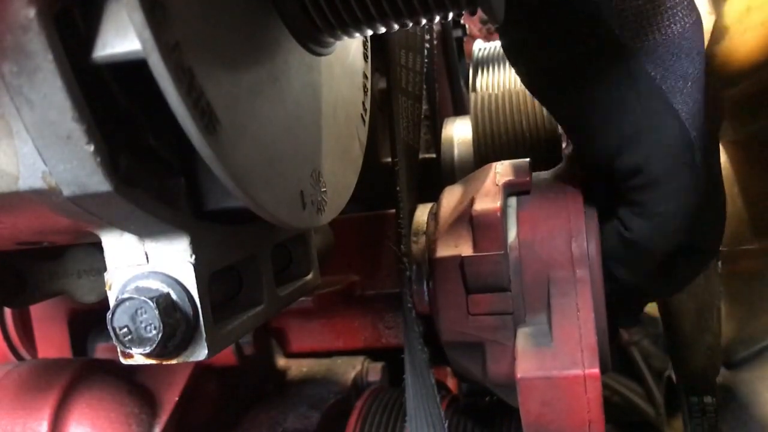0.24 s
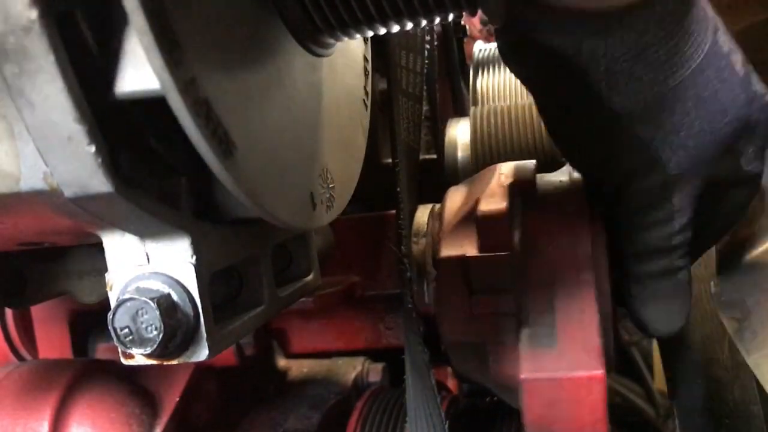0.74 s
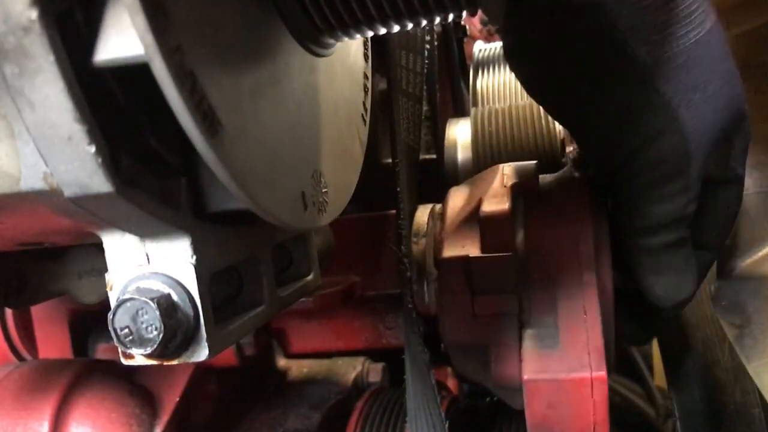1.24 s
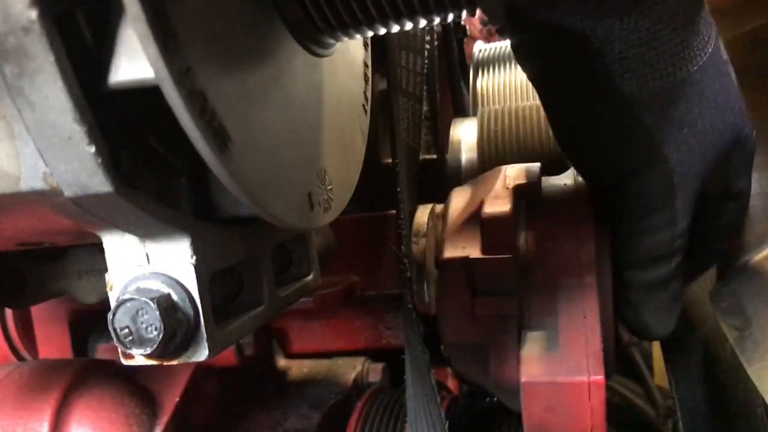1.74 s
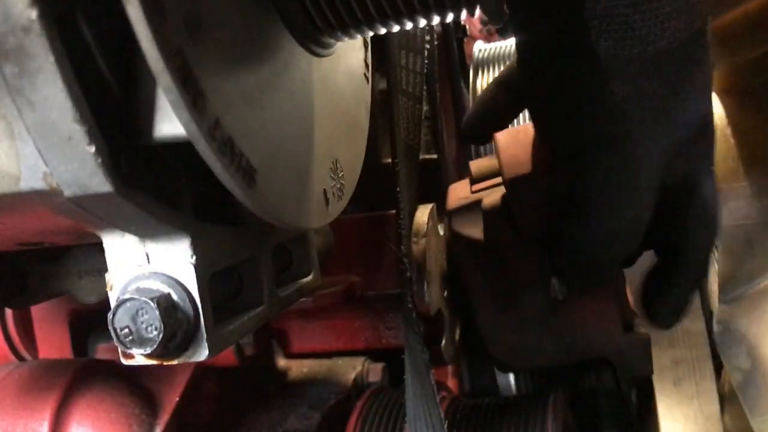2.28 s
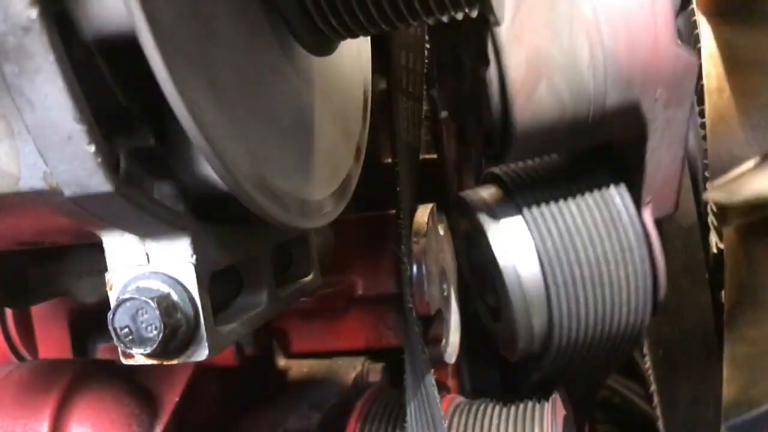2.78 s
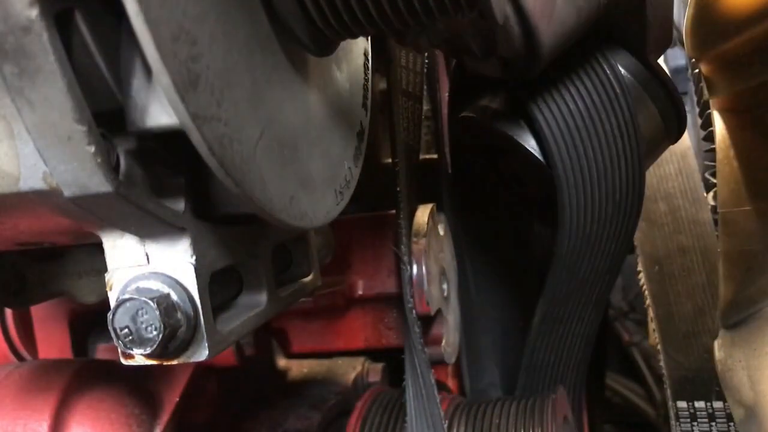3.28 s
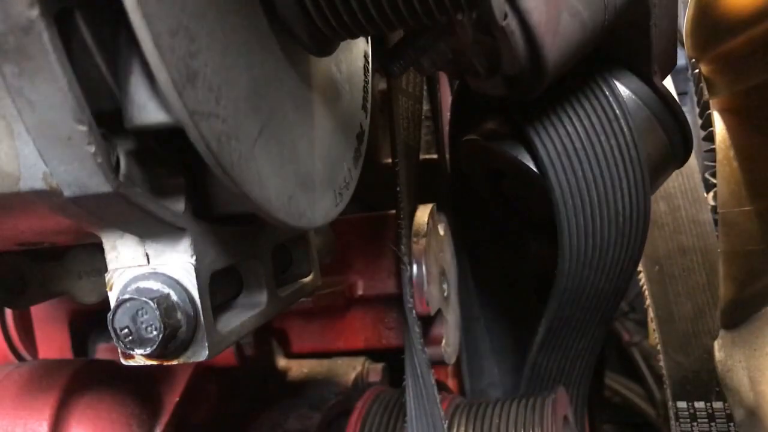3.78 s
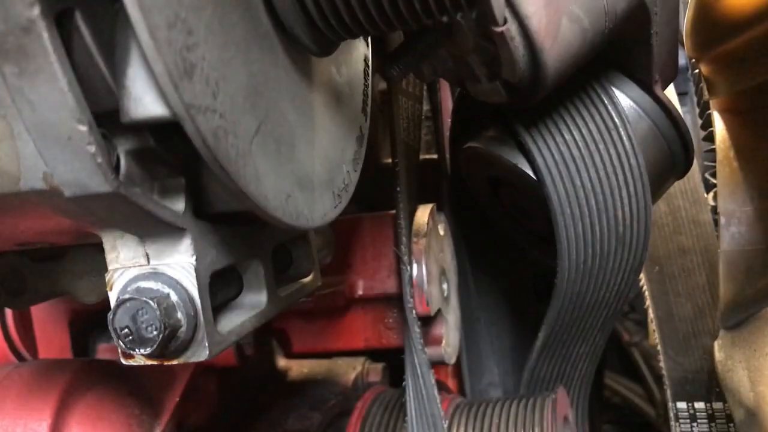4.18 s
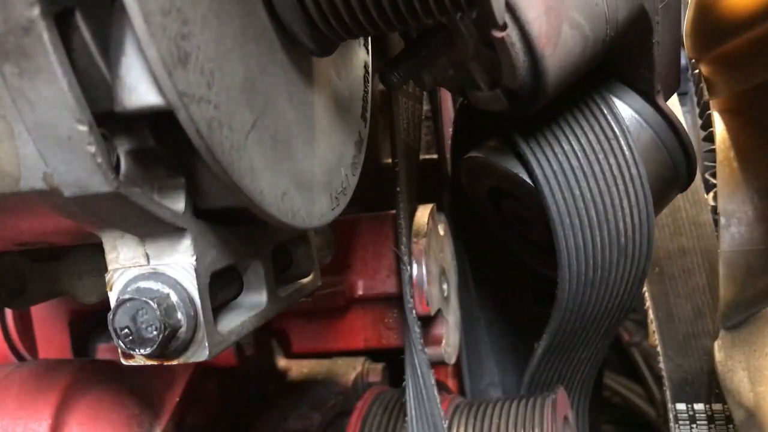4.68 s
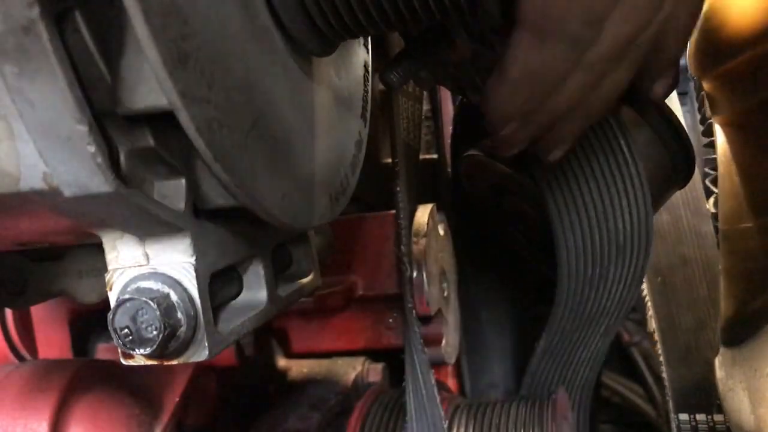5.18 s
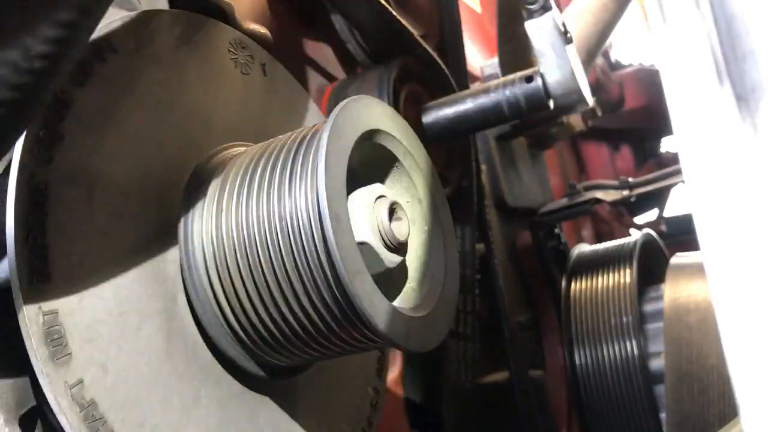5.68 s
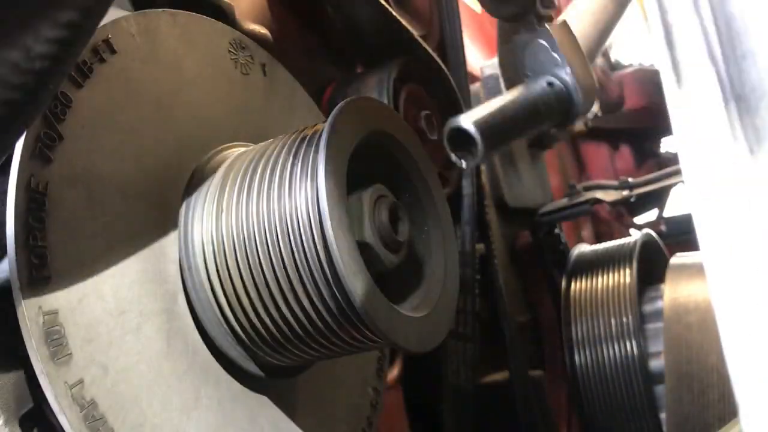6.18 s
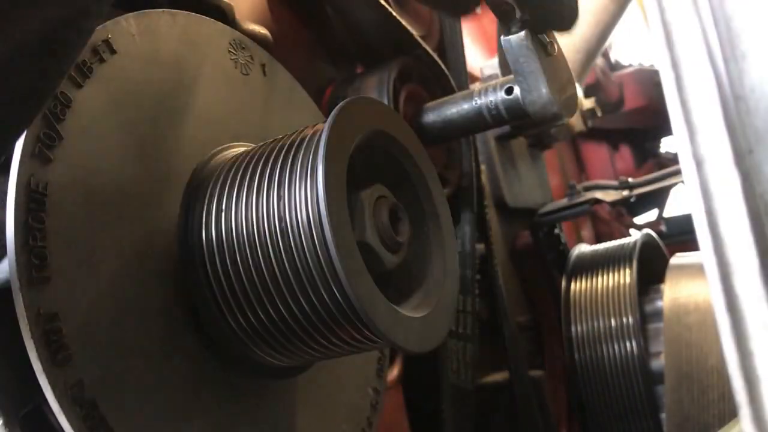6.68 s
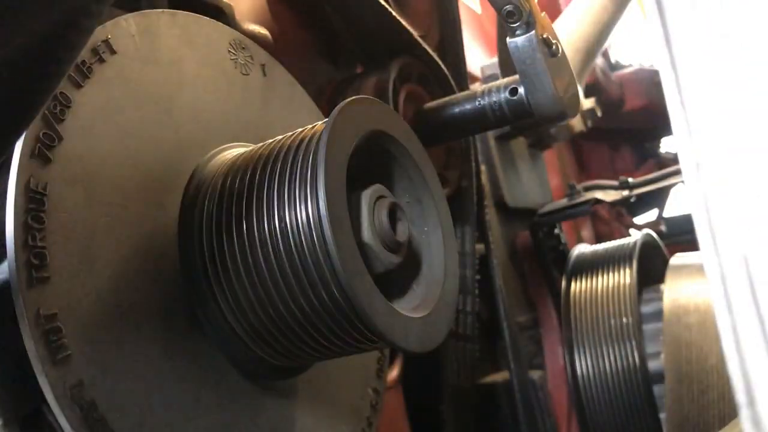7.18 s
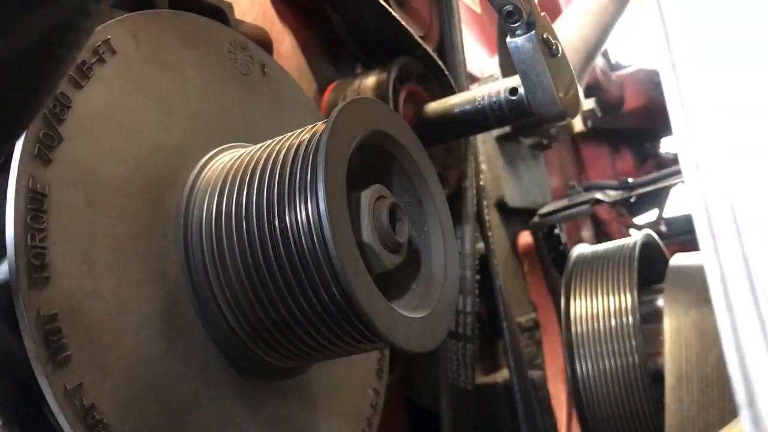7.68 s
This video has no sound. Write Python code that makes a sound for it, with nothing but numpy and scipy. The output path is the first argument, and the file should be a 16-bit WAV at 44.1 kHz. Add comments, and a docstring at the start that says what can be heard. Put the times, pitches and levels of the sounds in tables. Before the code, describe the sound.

In an engine bay, a heavy tensioner knocks and grinds, clacks hard, the slack belt flops, steel scrapes and chimes, then quieter ratchet clicks follow.

```python
"""Truck engine bay, close work: a tensioner knocks, clacks and grinds on its bracket; the slack belt flops.
Before an abrupt switch at 5.516 s a steel bolt scrapes and chimes; after it the shop is quieter.
Ratchet and socket click and a glove brushes throughout, over shop rumble, rustle, hiss and stray ticks.
Contacts are clumpy noise forces driving banks of resonances; bolt, pings and squeaks add wavering sines,
rasps and grinding a gliding rough band, rumble and rustle coloured noise."""
import sys
import numpy as np
from scipy import signal
from scipy.fft import rfft, irfft, next_fast_len
from scipy.io import wavfile
from scipy.ndimage import uniform_filter1d, map_coordinates

SR = 44100
rng = np.random.default_rng(int(sys.argv[2]) if len(sys.argv) > 2 else 0)


def master_out(mix):
    """Clip the mix to full scale and print it as 16-bit PCM to the path in sys.argv[1]."""
    frames = np.transpose(np.atleast_2d(mix))
    ceiling = np.clip(frames, -1, 1)
    pcm = np.round(ceiling * 32767).astype(np.int16)
    wavfile.write(sys.argv[1], SR, pcm)


N = 350165

# Resonances of the cast bracket. Each row: centre in Hz, width in Hz, relative level in dB.
CASTING_MODES = [(289, 50, 3.5), (462, 21.5, 2), (693, 102, 1.5), (888, 26, 6.5), (1000, 42, -7),
                 (1070, 140, -5.5), (1145, 50, -1), (1335, 30, -0.5), (1430, 240, -12.5), (1800, 77, -22),
                 (2220, 20.3, -12.5), (2415, 38.3, -15), (2760, 72, -23.5), (3180, 56, -13.5),
                 (3970, 20, -15), (4150, 96, -15), (4750, 60, -37.5)]
# Unresolved ringing between the casting's resonances. Each row: frequency in Hz, relative level in dB.
CASTING_WASH = [(60, -24), (250, -7.5), (900, -14.5), (2500, -11.5), (4500, -32.5), (6500, -41),
                (10000, -49.5), (15000, -62.5)]
# Unresolved ringing of the bolt. Each row: frequency in Hz, relative level in dB.
STEEL_WASH = [(300, -39.5), (1500, -14), (4000, -12), (7500, -23), (11000, -40), (15000, -56)]
# Resonances of ratchet and socket. Each row: centre in Hz, width in Hz, relative level in dB.
RATCHET_MODES = [(1360, 57, -9), (2580, 300, 7), (2930, 180, -4), (3750, 200, -5), (4200, 300, -7),
                 (5150, 230, -9), (6860, 400, -13), (8400, 300, -23), (11900, 250, -40)]
# Body of rustle and belt rub. Each row: frequency in Hz, relative density in dB per Hz.
RUSTLE_LOW = [(300, -1), (600, 8.5), (1000, 1.5), (1500, 1.5), (2200, -8), (3200, -27.5), (5000, -60.5)]


def amp(db):
    """Decibels to gain."""
    return 10 ** (np.asarray(db) / 20)


def unit(x):
    """x scaled to rms 1."""
    return x / np.sqrt(np.mean(x ** 2) + 1e-20)


def along(points, hz):
    """(Hz, value) points interpolated on a log frequency axis."""
    f, v = np.transpose(points)
    return np.interp(np.log(hz + 1), np.log(f + 1), v)


def clock(count=N):
    """Seconds at each sample."""
    return np.arange(count) / SR


def curves(rows):
    """One value per sample for each column after the time."""
    s, *cols = np.transpose(rows)
    return [np.interp(clock(), s, c) for c in cols]


def wobble(rate, count=N):
    """A smooth random curve, rate knots a second."""
    knots = rng.standard_normal(int(count * rate / SR) + 4)
    return map_coordinates(knots, [clock(count) * rate])


def filtered(x, response):
    """x times a complex response of frequency, zero-padded."""
    m = next_fast_len(len(x) + SR // 10)
    return irfft(rfft(x, m) * response(np.fft.rfftfreq(m, 1 / SR)), m)[:len(x)]


def noise(spectrum):
    """Coloured noise of rms 1."""
    return unit(filtered(rng.standard_normal(N), lambda hz: amp(along(spectrum, hz))))


def held(length, t60, rise):
    """An envelope that rises, holds for length and dies away; all in seconds."""
    t = clock(SR // 6)
    return (1 - np.exp(-t / rise)) * amp(-60 * np.maximum(t - length, 0) / t60)


def friction(envelope, grain_db, rate):
    """A force of tiny slips: noise in uneven clumps, its spectrum flattened to push at all frequencies."""
    shape = np.sqrt(envelope)
    clumps = amp(grain_db * wobble(rate, count=len(shape)))
    slips = rfft(rng.standard_normal(len(shape)) * clumps * shape)
    flat = irfft(np.exp(1j * np.angle(slips)), len(shape))
    return flat * shape


def ring(force, modes, wash, bright_db, vary_db):
    """A body driven by a force; each contact shares the energy differently among the modes."""
    count = len(force)
    hz = np.fft.rfftfreq(2 * count, 1 / SR)
    # countless minor modes leave the wash uneven
    ripple_db = 4.5 * map_coordinates(rng.standard_normal(size=300), [hz / 80])
    power = amp(along(wash, hz) + ripple_db) ** 2
    for c, width, db in modes:
        gain = amp(db + vary_db * rng.standard_normal())
        resonance = np.abs(hz * width / (c * c - hz * hz + 1j * hz * width))
        power = power + (gain * resonance) ** 2 / (1 + (hz / (2 * c)) ** 4)
    tilt = amp(bright_db * np.log2(np.clip(hz, 200, None) / 1000))  # bright_db per octave
    # minimum phase keeps it causal: nothing rings before the touch
    cepstrum = irfft(np.log(np.sqrt(power) * tilt + 1e-7))[:count]
    response = np.exp(rfft(2 * cepstrum, 2 * count) - cepstrum[0])
    return irfft(rfft(force, 2 * count) * response)[:count]


def favour(modes, mode_hz, boost_db):
    """The mode nearest mode_hz raised: the contact point decides which rings most."""
    nearest = np.argmin([abs(c - mode_hz) for c, width, db in modes])
    return [(c, width, db + boost_db * (k == nearest)) for k, (c, width, db) in enumerate(modes)]


def gliding_band(length, start_hz, end_hz, width_hz):
    """A rough resonance sliding in pitch: a random carrier pair whose wobble rate sets the width."""
    t = clock(SR // 6)
    turn = 2 * np.pi * np.cumsum(np.interp(t, [0, length], [start_hz, end_hz])) / SR
    in_phase = wobble(width_hz, count=len(t)) * np.sin(turn)
    return in_phase + wobble(width_hz, count=len(t)) * np.cos(turn)


def add(track, s, db, x):
    """Place x at time s with its loudest 5 ms at the level db."""
    part = track[round(s * SR):][:len(x)]
    loudest = np.sqrt(uniform_filter1d(x * x, SR // 200).max())
    part += (amp(db) * x / loudest)[:len(part)]


def background(level_db, spectrum, rustle_db, low_db, high_db, hiss_db):
    """Lumpy shop rumble under the fluctuating rustle of handling and a steady hiss."""
    # Fizz of the rustle. Each row: frequency in Hz, relative density in dB per Hz.
    rustle_high = [(1200, -9.5), (2600, 6.5), (4200, 4.5), (5500, -3.5), (7000, -4), (10000, -13),
                   (15500, -16)]
    rumble = amp(level_db) * unit(noise(spectrum) * amp(1.06 * wobble(25)))
    rub_db = rustle_db + 2.0 * wobble(120) + 1.2 * wobble(11)
    body = amp(rub_db + low_db) * noise(RUSTLE_LOW)
    fizz = amp(rub_db + high_db) * noise(rustle_high)
    hiss = amp(hiss_db) * noise([(1000, 6.5), (5000, -2.5), (15500, -14.0)])
    return rumble + hiss + body + fizz


def shop(x):
    """The workshop's answer after 5 ms: a noise tail whose decay time depends on frequency."""
    # Reverberation of the shop. Each row: frequency in Hz, t60 in seconds.
    shop_t60 = [(200, 0.55), (2000, 0.22), (6000, 0.33), (14000, 0.055)]
    hz, t, z = signal.stft(rng.standard_normal(SR // 2), SR, nperseg=256)
    tail = signal.istft(z * amp(-60 * t / along(shop_t60, hz)[:, None]), SR, nperseg=256)[1]
    return signal.fftconvolve(x, np.pad(tail, (SR // 200, 0)) / np.linalg.norm(tail))[:N]


def click(bright_db, t60, modes):
    """A hard little contact with a short buzz behind it, held for a share of its t60."""
    # Unresolved ringing of the ratchet. Each row: frequency in Hz, relative level in dB.
    ratchet_wash = [(200, -30), (1200, -2), (3000, -4), (7000, -18), (11000, -45), (15000, -49)]
    buzz_share = 0.079
    force = friction(held(buzz_share * t60, t60, rise=0.000085), grain_db=3.5, rate=900)
    return ring(force, modes, ratchet_wash, bright_db, vary_db=3)


def ticks(rustle_db):
    """Small parts tick at random, louder when the hands are busy."""
    ticks_per_s, over_rustle_db, spread_db = 16, 3.5, 5.5
    out = np.zeros(N)
    for when, size, dull in rng.random((round(ticks_per_s * N / SR), 3)):
        i = int(when * N)
        db = rustle_db[i] + over_rustle_db + spread_db * (2 * size - 1)
        add(out, i / SR, db, click(-9 * dull, t60=0.0094, modes=RATCHET_MODES))
    return out


def glove():
    """Short, gritty friction strokes of a rubber-coated glove over metal and belt."""
    # Each row: start in seconds, level in dB, length in seconds.
    brushes = [(0.762, -55, 0.088), (1.034, -49.5, 0.016), (1.08, -53.5, .018), (1.149, -45.5, 0.02),
               (1.188, -57, .012), (1.481, -45, 0.016), (1.833, -44, 0.0243), (2.029, -48, 0.02),
               (2.345, -49.5, 0.025), (2.449, -48.5, 0.064), (2.625, -47.5, 0.06), (3.638, -55, 0.037),
               (4.625, -51.5, 0.078), (4.943, -55, 0.017), (5.139, -45, 0.088), (5.346, -44, 0.021),
               (5.762, -50, 0.013), (5.822, -67.5, 0.051), (6.2, -59.5, 0.015), (6.412, -62.5, 0.016),
               (6.82, -65, 0.031), (6.919, -64, 0.022), (7.083, -67, 0.056), (7.364, -61.5, 0.046),
               (7.43, -54.5, 0.034)]
    # Resonances under the glove. Each row: centre in Hz, width in Hz, relative level in dB.
    glove_modes = [(1370, 410, -5), (2105, 47, 8), (2624, 36, 11), (3800, 220, 2), (6270, 320, -12.5),
                   (9100, 590, -15.5)]
    # Unresolved ringing. Each row: frequency in Hz, relative level in dB.
    glove_wash = [(300, -3), (1200, 5.5), (4000, -6), (7000, -19.5), (10000, -24.5), (15000, -30)]
    out = np.zeros(N)
    for s, db, length in brushes:
        force = friction(held(length, t60=0.057, rise=0.0023), grain_db=4.5, rate=440)
        add(out, s, db, ring(force, glove_modes, glove_wash, bright_db=0, vary_db=1.0))
    return out


def ratchet():
    """Ratchet and socket click, with a different balance of modes at each contact."""
    # Each row: start in seconds, level in dB, brightness in dB/octave, t60 in seconds,
    # favoured mode in Hz, its boost in dB.
    contacts = [(1.295, -53, -5, .044, 4050, 19), (1.596, -49, -8, 0.023, 4050, 6),
                (1.611, -52, -11, 0.022, 2930, 2), (2.097, -40, -0.5, 0.037, 2930, 3),
                (2.139, -34, -4, .03, 4200, 12), (2.159, -44, -3, 0.035, 4200, 4),
                (2.236, -44.5, -8.5, 0.032, 1360, 5), (2.263, -56, -8, 0.025, 1360, 5),
                (2.543, -52, -1, .012, 5150, 8), (5.392, -38.5, -9, .06, 4050, 7),
                (6.021, -39, 5.5, 0.024, 6860, 8), (6.133, -40, -3.5, 0.064, 2580, 4),
                (6.218, -64, 0, 0.013, 4050, 2), (6.2751, -34.5, 0.5, 0.032, 2930, 14),
                (6.321, -60, -2, .05, 4050, 14), (6.335, -54.5, -2.5, .025, 3750, 12),
                (6.459, -51, -4, 0.035, 3750, 12), (6.513, -49.5, -2, 0.038, 2580, 2),
                (6.517, -34.5, -1.5, 0.042, 6860, 9), (6.72, -46.5, 2, 0.034, 2580, 3),
                (6.764, -58.5, 9, 0.02, 6860, -2), (7.297, -55, -3, 0.051, 1360, 5),
                (7.492, -47.5, 2.5, .028, 2580, -7), (7.778, -56, 2, 0.074, 4050, 15)]
    out = np.zeros(N)
    for s, db, bright_db, t60, mode_hz, boost_db in contacts:
        add(out, s, db, click(bright_db, t60, favour(RATCHET_MODES, mode_hz, boost_db)))
    return out


def bolt_modes(place):
    """The bolt's resonances when rubbed at a place between shank (0) and head (1)."""
    # Each row: centre in Hz, width in Hz, relative level rubbed on the shank in dB, on the head in dB.
    resonances = [(1624, 120, -14, -18), (1930, 40, -6, -18), (2287, 90, -13, -3), (2920, 72, -15, -20),
                  (3430, 60, -13, -7), (3760, 40, 2, -15), (4230, 52, -11, -12), (4420, 50, -13, 4),
                  (5276, 53, -11, -9), (6480, 70, -4, -19), (6600, 60, -14, -30), (7370, 90, -11, -8),
                  (7840, 50, -22, -28), (9220, 80, -24, -20), (9420, 90, -10, -30), (9840, 60, -32, -11),
                  (11200, 70, -21, -15), (11450, 100, -27, -25), (13000, 110, -31, -32),
                  (13500, 60, -42, -32), (14900, 90, -34, -25), (15170, 100, -36, -20)]
    place = np.clip(place, 0, 1)
    return [(hz, width, shank_db + place * (head_db - shank_db))
            for hz, width, shank_db, head_db in resonances]


def rasps():
    """Dry, gritty drags, each with one rough resonance that glides as the contact moves."""
    # Each row: start in seconds, level in dB, length in seconds, start pitch in Hz, end pitch in Hz.
    drags = [(2.468, -55, .045, 3700, 3600), (2.522, -50, 0.015, 3950, 3800),
             (2.655, -54.5, .035, 2300, 3000), (3.16, -63, 0.052, 3900, 3800),
             (3.287, -69.5, 0.15, 4800, 4600), (3.386, -60.5, 0.038, 4600, 4860),
             (3.635, -60.5, 0.036, 4400, 4660), (3.866, -51, 0.023, 4700, 4100),
             (4.091, -56, 0.013, 4300, 4580), (4.153, -52, 0.028, 4200, 5130),
             (4.358, -55, 0.042, 4750, 4150), (4.778, -67, 0.056, 3100, 3100),
             (4.937, -63, 0.097, 3500, 3280), (5.139, -49.5, 0.092, 2700, 2600),
             (5.355, -57, 0.036, 3700, 3900), (5.39, -42, 0.014, 3800, 3500)]
    out = np.zeros(N)
    for s, db, length, start_hz, end_hz in drags:
        drag = held(length, t60=0.019, rise=.004)
        squeal = gliding_band(length, start_hz, end_hz, width_hz=650) * drag
        force = friction(drag, grain_db=1, rate=540)
        grit = ring(force, bolt_modes(.5), STEEL_WASH, bright_db=-4, vary_db=3)
        add(out, s, db, unit(squeal) + unit(grit))
    return out


def bolt():
    """Steel on steel: steady slips make the modes sing, uneven ones rasp; a faint ring outlasts each stroke."""
    # Each row: start in seconds, level in dB, length in seconds, place from shank 0 to head 1,
    # favoured mode in Hz, its boost in dB, grit over tone in dB, brightness in dB/octave.
    strokes = [(2.725, -59, .055, .1, 6600, 7, -14, .5), (3.737, -40.5, .017, .6, 3760, 12, -6, -1.5),
               (3.842, -40, .0094, .6, 2287, 6, -6, -1), (3.851, -34.5, .016, .65, 6600, 16, -8, 3),
               (3.943, -36, .014, .35, 4230, 12, -10, 3), (3.958, -30.5, .014, .3, 4230, 13, -5, 2.3),
               (4.053, -55, .01, .6, 4230, 14, -10, 1), (4.081, -43.5, .012, .4, 7840, 17, -3, 1.5),
               (4.18, -50.5, .03, .45, 6480, 7, -9, -2), (4.283, -47, .002, .3, 6480, 4, 3, -1),
               (4.344, -47, .006, .3, 4230, 6, 3, -2), (4.392, -48, .017, .35, 4420, 8, -3, -2),
               (4.499, -59, .02, .1, 3760, 3, -13, -2), (4.526, -45.5, .025, .5, 4230, 12, -10, -1),
               (4.691, -46.5, .039, 0, 3760, 4, -19, -1), (4.733, -38.5, .026, 1, 4420, 1, -14, .7),
               (4.829, -53, .003, .8, 2287, 14, -3, -7), (4.869, -39, .026, .2, 1624, 17, -8, 3.6),
               (4.893, -36, .006, .15, 9420, 4, -6, 2.5), (5.28, -59, .017, 0, 6600, 30, -14, -1)]
    glide_share = .007  # typical pitch offset at the start of a stroke, settling by its end
    contact_width_hz = 76  # a rough contact damps the bolt and widens its modes
    out, t = np.zeros(N), clock(SR // 6)
    for s, db, length, place, mode_hz, boost_db, grit_db, bright_db in strokes:
        modes = favour(bolt_modes(place), mode_hz, boost_db)
        hz, width, level_db = np.transpose(modes)[..., None]
        luck, detune, lead, lag = rng.standard_normal((4, len(modes), 1))
        gain = amp(level_db + 3 * luck + bright_db * np.log2(hz / hz[0]))
        # changing contact pressure bends each mode
        bend = 1 + .005 * np.array([wobble(220, count=len(t)) for _ in modes])
        bend = bend + glide_share * rng.standard_normal() * np.maximum(1 - t / length, 0)
        turn = 2 * np.pi * (hz + .5 * width * detune) * np.cumsum(bend, axis=1) / SR + np.pi * lead
        # a rod bends in two planes, so each mode is a close, beating pair
        pair = np.sin(turn) + 0.5 * np.sin(turn + np.pi * (width * t + lag))
        song = np.sum(gain * pair, axis=0)
        stroke = held(length, t60=0.03, rise=0.0016)
        after_ring = amp(-28) * held(length, t60=.22, rise=.005)
        tone = song * (stroke * amp(2 * wobble(250, count=len(t))) + after_ring)
        damped = [(c, w + contact_width_hz, mode_db) for c, w, mode_db in modes]
        force = friction(stroke, grain_db=2.5, rate=710)
        grit = ring(force, damped, STEEL_WASH, bright_db, vary_db=2.5)
        add(out, s, db, unit(tone) + amp(grit_db) * unit(grit))
    return out


def slide():
    """The released belt rubs over the pulley: noise that swells by 14 dB until it drops off."""
    length_s, end_s, end_db = 0.12, 3.02, -37.5
    t = clock() - end_s
    swell_db = 14 * np.minimum(t, 0) / length_s - 60 * np.maximum(t, 0) / 0.021
    return amp(end_db) * amp(swell_db) * (t > -length_s) * noise(RUSTLE_LOW)


def belt():
    """The slack belt flops on the pulleys; short wavering sines ping and squeak, some from the scraped bolt."""
    # Each row: start in seconds, level in dB.
    flops = [(2.917, -26.5), (2.943, -28.5), (2.97, -31), (3.185, -41)]
    # Pings and squeaks. Each row: start in seconds, level in dB, length in seconds, pitch in Hz.
    pings = [(2.369, -42.5, 0.028, 2056), (2.636, -46, 0.038, 900), (2.747, -61, .03, 5120),
             (3.026, -57.5, 0.0025, 4120), (3.026, -27, 0.003, 1290), (3.025, -42.5, 0.0028, 1950),
             (3.363, -52.5, 0.0054, 4170), (4.875, -46.5, .03, 807), (4.869, -44.5, 0.036, 1614)]
    # Belt resonances. Each row: centre in Hz, width in Hz, relative level in dB.
    belt_modes = [(90, 18, -36), (231, 63, 6.5), (320, 10, 13.5), (380, 58, -20), (678, 39, 2.5),
                  (1216, 320, -3)]
    belt_wash = [(100, -11.5), (700, -6.0), (2000, -51), (8000, -74)]  # Hz, dB
    out, t = np.zeros(N), clock(SR // 6)
    for s, db in flops:
        force = friction(held(0.011, t60=0.12, rise=0.00051), grain_db=-2, rate=308)
        add(out, s, db, ring(force, belt_modes, belt_wash, bright_db=-5.0, vary_db=1.5))
    for s, db, length, hz in pings:
        phase = 2 * np.pi * np.cumsum(hz * (1 + 0.004 * wobble(250, count=len(t)))) / SR
        flutter = amp(2.1 * wobble(150, count=len(t)))
        add(out, s, db, np.sin(phase) * flutter * held(length, t60=0.044, rise=0.0006))
    return out


def clack():
    """The freed tensioner swings into something close by: a dead ring with one hard push in the middle."""
    out, t = np.zeros(N), clock(SR // 6)
    dead_ring = np.sin(2 * np.pi * 1390 * t) * held(0.0056, t60=0.0044, rise=0.00015)
    add(out, 2.8783, -16.5, dead_ring)
    u = t / 0.00013
    push = u ** 2 * np.exp(-u) - 0.4 * (u / 5) ** 2 * np.exp(-u / 5)
    add(out, 2.8811, -16, push)
    force = friction(held(0.025, t60=0.0078, rise=0.00087), grain_db=2.5, rate=1800)
    crack = ring(force, CASTING_MODES, CASTING_WASH, bright_db=0.0, vary_db=-2)
    add(out, 2.878, -24, crack * held(0.0046, t60=0.013, rise=0.00035))
    return out


def judder():
    """After a heavy knock the tensioner grinds along the bracket, slowing: pitch sinks, loose parts rattle."""
    start_s, length_s, level_db = 1.91, .047, -24
    fade_db_per_s, rattle_over_groan_db = 250, -4
    out, t = np.zeros(N), clock(SR // 6)
    drag = held(length_s, t60=.025, rise=.002) * amp(-fade_db_per_s * t)
    groan = gliding_band(length_s, start_hz=820, end_hz=420, width_hz=330) * drag
    force = friction(drag, grain_db=3.5, rate=500)
    rattle = ring(force, CASTING_MODES, CASTING_WASH, bright_db=1, vary_db=2)
    add(out, start_s, level_db, unit(groan) + amp(rattle_over_groan_db) * unit(rattle))
    return out


def tensioner():
    """Heavy parts chatter briefly, longer when the blow is dull; the hand soon damps the casting."""
    # Each row: start in seconds, level in dB, damping t60 in seconds, favoured mode in Hz,
    # its boost in dB, brightness in dB/octave.
    blows = [(0.974, -36.5, 0.2, 455, 4, -7.5), (1.336, -39.5, 0.028, 1510, 26, 2.5),
             (1.387, -42.5, 0.056, 689, 10, 0.5), (1.407, -49, 0.041, 1800, 12, 0.5),
             (1.436, -48, .04, 1070, 10, 0), (1.658, -28.5, 0.046, 689, 0, 0.5),
             (1.665, -26, .16, 300, 24, 1.5), (1.725, -36.5, 0.042, 689, 10, -5),
             (1.738, -37, 0.048, 455, 11, -8), (1.763, -51, 0.023, 1510, 22, 0),
             (1.89, -25.5, 0.06, 300, 20, 1), (1.893, -18, 0.075, 885, 4.5, 1.6),
             (1.915, -28.5, 0.2, 300, 14, -2), (2.135, -17.5, 0.048, 689, 9, .6),
             (2.157, -31, .022, 689, 4, 2), (2.372, -38.5, 0.14, 455, 10, -3.5),
             (2.675, -35.5, 0.044, 689, 11, -3), (2.781, -39, .04, 1335, 12, 1.5),
             (2.792, -31, 0.038, 1070, 9, 0), (2.806, -37.5, .03, 1070, 11, -1.5),
             (3.457, -38, .04, 300, 18, -10), (4.338, -45, 0.066, 1070, 18, 2),
             (5.279, -43, 0.032, 1070, 12, -3), (5.386, -44, .03, 1335, 12, 1),
             (4.89, -43, 0.028, 885, 12, 3), (5.483, -29, 0.51, 1145, 22, 0.5),
             (5.486, -31, 0.4, 455, 17.5, 3), (5.86, -54, .06, 1510, 25, -2.5),
             (6.029, -29.5, 0.077, 885, 20.5, -0.5), (6.035, -37, 0.17, 1000, 24, -0.5),
             (6.052, -37, 0.018, 1510, 20, -4), (6.278, -38, 0.055, 455, 12, -5),
             (6.518, -39.5, 0.2, 1350, 14, 0), (6.722, -46.5, 0.12, 689, 8.5, -4.5),
             (7.366, -42.5, 0.073, 300, 26, -14.5), (7.432, -42.5, .15, 455, 1, -14.5),
             (7.509, -47, 0.063, 1510, 11, -2.5), (7.567, -46, 0.1, 1070, 2.5, -1.5),
             (7.772, -40.5, 0.23, 300, 3, -10), (7.843, -47, 0.097, 689, 8, 0)]
    chatter_s, doubles_db = 0.0091, 11.5  # length at 0 dB/octave; doubles when duller by so many dB/octave
    out = np.zeros(N)
    for s, db, t60, mode_hz, boost_db, bright_db in blows:
        chatter = chatter_s * 2 ** (-bright_db / doubles_db)
        modes = favour(CASTING_MODES, mode_hz, boost_db)
        force = friction(held(chatter, t60=0.12, rise=0.00078), grain_db=2.5, rate=650)
        blow = ring(force, modes, CASTING_WASH, bright_db, vary_db=1.5)
        add(out, s, db, blow * held(chatter, t60, rise=0.00034))
    return out


def scene():
    """Two stretches of work, switched hard: the first mono, the second one sample later on the left."""
    # Rumble before and after the switch. Each row: frequency in Hz, relative density in dB per Hz.
    near_rumble = [(13, -36), (22, -14.5), (59, 2.5), (123, -2.5), (237, -8.5), (268, -12), (313, -10.5),
                   (447, -21.5), (556, -24.5), (620, -23), (900, -31), (1170, -30), (1980, -120)]
    far_rumble = [(13, -45), (22, -26), (46, -3.5), (64, 2), (92, -6), (129, 0.5), (200, -15.5),
                  (248, -11.5), (318, -18.5), (344, -20.5), (434, -20), (469, -30.5), (592, -30),
                  (900, -28), (1170, -92), (1980, -120)]
    # How hard the hands rub before and after. Each row: time in seconds, rustle in dB before band offsets.
    near_rustle = [(0.95, -66), (1.31, -62.5), (2.42, -63.5), (2.58, -57), (2.87, -59.5), (3.19, -65.5),
                   (3.39, -66), (3.65, -70.5), (3.8, -61), (4.01, -63.5), (4.39, -68.5), (4.6, -66.5),
                   (4.77, -60), (5.18, -63.5), (5.36, -58.5), (5.42, -58.5)]
    far_rustle = [(5.55, -79.5), (5.8, -73), (5.98, -74.5), (6.5, -74), (6.9, -72.5), (7.12, -72),
                  (7.25, -78.5), (7.5, -70.5), (7.68, -79), (7.85, -73)]
    start_s, fade_in_s, switch_s = 0.724, .012, 5.516
    t = clock()

    knocks = tensioner() + judder() + belt() + slide() + clack()
    steel = bolt() + rasps()
    clicks = ratchet()
    answer = shop(amp(-27) * knocks + amp(-26.5) * steel + amp(-33) * clicks)
    work = knocks + steel + clicks + glove() + answer

    near_db, = curves(near_rustle)
    near = background(-37.5, near_rumble, near_db, low_db=7.0, high_db=-4.5, hiss_db=-73)
    near = near + ticks(near_db)
    far_db, = curves(far_rustle)
    far = background(-49.5, far_rumble, far_db, low_db=9.0, high_db=-5.5, hiss_db=-80.0)
    far = far + ticks(far_db)

    first = (near + work) * np.clip((t - start_s) / fade_in_s, 0, 1) * (t < switch_s)
    second = far * (t >= switch_s) + work * (t > switch_s + .2)  # background alone for 0.2 s
    return first + np.array([np.pad(second, (1, 0))[:N], second])


def record(dry):
    """Band limit: the response falls to zero over the last 100 Hz below top_hz."""
    top_hz = 15780
    return np.array([filtered(x, lambda hz: np.clip((top_hz - hz) / 100, 0, 1)) for x in dry])


dry = scene()
out = record(dry)
master_out(out)
```